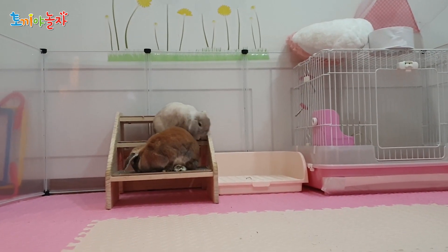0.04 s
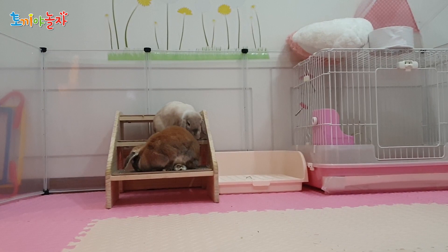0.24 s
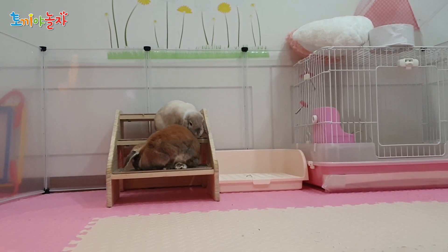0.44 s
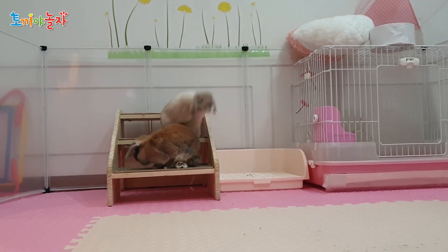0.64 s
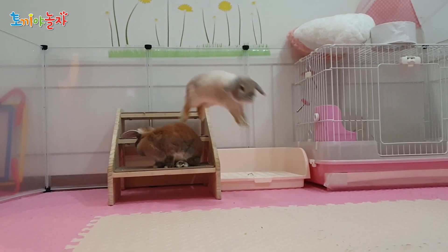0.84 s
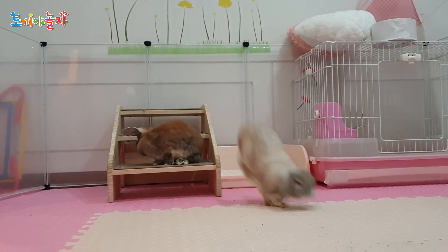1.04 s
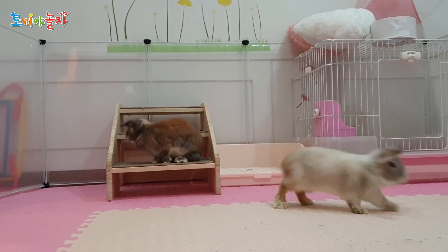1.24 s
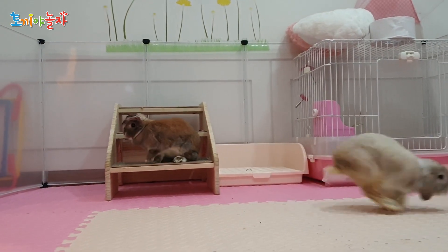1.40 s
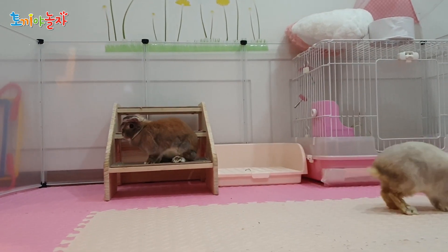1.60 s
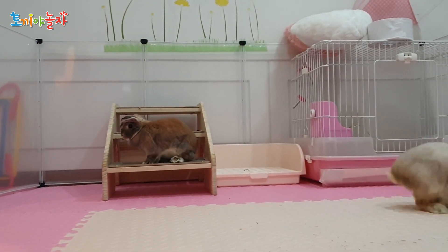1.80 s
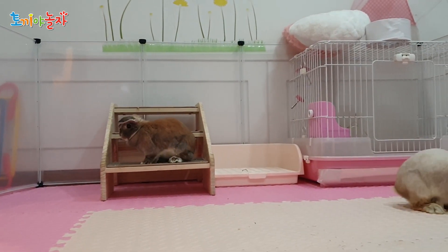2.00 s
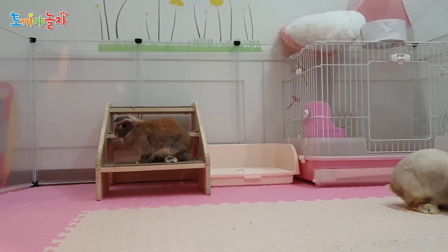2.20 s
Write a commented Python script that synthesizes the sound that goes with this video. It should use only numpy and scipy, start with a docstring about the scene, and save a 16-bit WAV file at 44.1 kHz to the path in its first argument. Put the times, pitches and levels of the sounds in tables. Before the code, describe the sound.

A rabbit thumps down onto a mat and scuffs away, after close microphone handling knocks.

```python
"""A rabbit jumps off a wooden step onto a foam mat, heard in stereo in a small room. Forepaws slap,
hind feet follow with dull pats, the floor booms and the pen rings faintly; it hops away with soft scuffs.
The recorder is hand-held: fingers knock and slide on its casing, close to the right microphone.
Behind it all lies quiet room tone, a low rumble under faint hiss."""
import sys
import numpy as np
from scipy import signal
from scipy.fft import rfft, irfft
from scipy.io import wavfile

SR = 44100
rng = np.random.default_rng(int(sys.argv[2]) if len(sys.argv) > 2 else 0)


def digitize_waveform(pressure):
    """Quantize a signal to 16-bit integers and store it at the path in sys.argv[1].

    Rows of a 2-D input are taken as channels; values are limited to [-1, 1].
    """
    field = np.atleast_2d(pressure).T
    bounded = np.clip(field, -1, 1)
    quanta = np.round(bounded * 32767).astype(np.int16)
    wavfile.write(sys.argv[1], SR, quanta)


N = 103635
T = np.arange(N) / SR


def from_db(db):
    """Decibels to gain."""
    return 10 ** (np.asarray(db) / 20)


def unit_rms(x):
    """Scale to unit rms."""
    return x / np.sqrt(np.mean(x ** 2) + 1e-20)


def level(rows):
    """Gain over time from (s, dB) rows."""
    return from_db(np.interp(T, *np.transpose(rows)))


def octaves():
    """The frequency axis in octaves."""
    return np.log2(np.maximum(np.arange(N // 2 + 1) * SR / N, 1))


def colour(points):
    """dB per frequency from (Hz, dB) rows."""
    hz, db = np.transpose(points)
    return np.interp(octaves(), np.log2(hz), db)


def noise(db, grain=0):
    """Two channels of coloured noise; grain makes the level jump every 32 samples."""
    white = rng.standard_normal((2, N))
    jumps = np.repeat(rng.standard_normal(N // 32 + 1), 32)[:N]
    return unit_rms(irfft(rfft(white * np.exp(grain * jumps)) * from_db(db), N))


def stroke(s, rise, decay):
    """A linear rise from time s, then an exponential fall."""
    return np.clip((T - s) / rise, 0, 1) * np.exp(-np.maximum(T - s - rise, 0) / decay)


def cut(x, hz, kind, order=2):
    """Low- or high-pass."""
    return signal.sosfilt(signal.butter(order, min(hz, .45 * SR), kind, fs=SR, output="sos"), x + 1e-18)


def resonate(x, hz, q):
    """A resonance with unit gain at its peak."""
    return signal.lfilter(*signal.iirpeak(min(hz, .45 * SR), q, fs=SR), x + 1e-18)


def room_tone():
    """Wavering rumble, much alike at both microphones, under a faint hiss."""
    # Each row: time in seconds, level in dB.
    rumble_levels = [(0, -51), (.7, -49), (1.0, -55), (1.45, -47.5), (1.7, -52), (1.84, -59), (2.02, -49),
                     (2.35, -59.5)]
    # Spectra. Each row: frequency in Hz, relative level in dB.
    rumble_colour = [(25, -34), (40, 2), (58, 6.5), (100, -6.5), (200, -10), (300, -17.5), (450, -29.5),
                     (1000, -34.5), (4000, -89)]
    hiss_colour = [(150, -3.5), (500, -2.5), (1000, -5), (3000, -9.5), (8500, -18), (12500, -7.5),
                   (16000, -14)]
    sides = noise(colour(rumble_colour))
    rumble = level(rumble_levels) * unit_rms(sides + 0.47 * sides[::-1])
    return rumble + from_db(-67.5) * noise(colour(hiss_colour))


def reverb(x, t60=0.29):
    """The small room's dense dying tail, different at each microphone."""
    tail = rng.standard_normal((2, N)) * stroke(0.013, 0.007, t60 / np.log(1000))
    return signal.fftconvolve(x, unit_rms(tail) / np.sqrt(N), axes=1)[:, :N]


def grip_rumble():
    """The hand's grip rumbles through the recorder."""
    # Each row: time in seconds, level in dB.
    grip_levels = [(0, -47), (.15, -36), (.3, -33), (.37, -54), (.52, -52), (.68, -51), (.76, -44.5),
                   (.83, -35), (1.0, -55.5), (1.44, -50), (1.56, -51.5), (1.83, -59.5), (2.35, -52.5)]
    # Each row: frequency in Hz, relative level in dB.
    grip_colour = [(25, -25), (55, 14.5), (100, 4.5), (200, -6.5), (400, -20.5), (1500, -42.5), (6000, -60)]
    return level(grip_levels) * noise(colour(grip_colour))[0]


def finger_slide(split_hz=9300):
    """Skin hisses as it slides by the microphone; its top treble comes and goes."""
    # The whole hiss, then its treble against the rest. Each row: time in seconds, level in dB.
    slide_levels = [(0, -100), (.3, -69.5), (.45, -57.5), (.57, -67), (.69, -56), (.77, -59), (.89, -51.5),
                    (1.05, -50.5), (1.15, -61), (1.36, -53.5), (1.5, -63), (1.55, -49), (1.66, -59.5),
                    (1.87, -63), (1.93, -55), (2.02, -63.5), (2.2, -76), (2.35, -70)]
    treble_levels = [(.2, 13.5), (.45, -14), (.75, -4.5), (.92, 2), (1.15, -4.5), (1.7, -8.5), (1.93, -0.5),
                     (2.1, -12)]
    # Each row: frequency in Hz, relative level in dB.
    skin_colour = [(1000, -22.5), (3700, -18), (4900, -5.5), (6500, -6), (7400, -20.5), (9500, -21.5),
                   (12500, -0.5), (14500, -8.5), (16000, -16)]
    skin = noise(colour(skin_colour), grain=0.18)
    treble = level(treble_levels) * cut(skin, split_hz, "high", order=4)
    return level(slide_levels) * (cut(skin, split_hz, "low", order=4) + treble)


def casing_ticks():
    """Tiny clicks ring the casing's high modes."""
    # Each row: start in seconds, relative level in dB.
    ticks = [(.1325, -33), (0.1601, -7.5)]
    # Each row: frequency in Hz, Q, gain in dB.
    modes = [(2950, 9.2, -8.5), (7040, 18, -9.5), (8300, 13, -17.5), (11360, 14, -0.5), (15000, 22, -27)]
    clicks = sum(from_db(db) * np.diff(1.0 * (T >= s), prepend=0) for s, db in ticks)
    return sum(from_db(db) * resonate(clicks, hz, q) for hz, q, db in modes)


def finger_knocks():
    """Each knock is a softened push that thuds in the casing's low modes."""
    # Each row: start in seconds, relative level in dB, contact brightness in Hz.
    knocks = [(0.021, -19.5, 133), (0.066, -25.5, 116), (0.108, -25, 131), (0.133, -34, 184),
              (0.157, -22.5, 172), (0.191, -29.5, 404), (0.2082, -4, 330), (0.212, -16.5, 363),
              (0.2572, -13, 288), (0.2652, -19, 261), (.287, -17, 234), (0.4440, -25, 324),
              (0.55, -31.5, 104), (0.572, -27, 109), (0.795, -23.5, 147), (0.8057, -30, 213),
              (0.83, -34, 250), (1.491, -27, 115)]
    # Each row: frequency in Hz, Q, gain in dB.
    modes = [(78.2, 2.33, 3.5), (234, 1.37, -4)]
    pushes = sum(from_db(db) * cut(1.0 * (T >= s), hz, "low", order=3) for s, db, hz in knocks)
    pulses = np.diff(pushes, prepend=0)
    thuds = -sum(from_db(db) * q * resonate(pulses, hz, q) * SR / (2 * np.pi * hz) for hz, q, db in modes)
    return cut(thuds, 50, "high", order=1)


def casing_cracks():
    """The gripped shell cracks; skin drags on it with a dry rustle."""
    # Each row: start in seconds, relative level in dB, lower and upper band edge in Hz.
    cracks = [(.133, -53, 1000, 5000), (.2091, -19, 604, 4000), (0.2126, -12.5, 626, 2750),
              (.2582, -22.5, 2720, 3130), (.2885, -45, 900, 2200), (.3138, -53, 4500, 5800),
              (.4445, -25, 670, 1970), (.657, -51, 700, 2500), (.8055, -33.5, 1400, 4480),
              (.8313, -35, 1100, 5230)]
    # Each row: start in seconds, level in dB, rise and decay in seconds.
    drags = [(.29, -65.5, 0.035, 0.28), (.42, -70.5, 0.055, 0.042), (.65, -65.5, 0.01, 0.11),
             (.81, -63.5, 0.02, 0.039)]
    # Each row: frequency in Hz, relative level in dB.
    grit_colour = [(400, 3), (1000, 4), (1700, 0), (2300, 1), (3100, -12.5), (3700, -18), (5000, -16),
                   (6500, -23)]
    snaps = -sum(from_db(db) * cut(cut(stroke(s, 1 / SR, 0.0019), low, "high"), top, "low", order=8)
                 for s, db, low, top in cracks)
    # A faint, brief hiss after each crack.
    noise_tails = sum(from_db(db - 35.5) * stroke(s, 1 / SR, decay=0.02) for s, db, _, _ in cracks)
    rustles = sum(from_db(db) * stroke(s, rise, decay) for s, db, rise, decay in drags)
    return snaps + (noise_tails + rustles) * noise(colour(grit_colour), grain=0.3)[0]


def handling():
    """Handling noise, close to the right microphone and weaker in the left."""
    grip, slide = grip_rumble(), finger_slide()
    shell = cut(finger_knocks() + casing_cracks() + grip, 42, "high")
    return sum(x * from_db([[left_db], [0]])
               for x, left_db in [(shell, -35), (casing_ticks(), -6), (slide, -17)])


def floor_and_pen():
    """The rabbit's weight booms in the floor and sets floor and pen ringing, centred in the image."""
    # Each row: start in seconds, level in dB, pitch in Hz, swell in seconds.
    thumps = [(1.097, -19, 72.8, 0.03), (1.174, -22.5, 80, 0.02), (1.276, -42, 73.3, 0.047),
              (1.535, -34.5, 73.6, 0.016), (1.593, -42.5, 76.8, 0.016), (1.642, -53, 56.3, 0.044),
              (1.922, -38, 83.1, 0.03), (2.197, -43, 58.5, 0.034), (2.286, -44, 57.6, 0.028)]
    # Footfalls that start the ringing. Each row: start in seconds, level in dB.
    shakes = [(1.083, -38.5), (1.1341, -34), (1.1732, -28.5), (1.224, -30), (1.2882, -41.5), (1.3385, -44),
              (1.947, -62)]
    # Each row: frequency in Hz, gain in dB, seconds to fall 60 dB.
    pen_modes = [(156.6, 2, 0.19), (158.72, -6.5, 0.64), (304, -13.5, 0.3), (419, -25.5, 0.28),
                 (590, -28, 0.16), (628, -26, 0.1), (680, -26.5, 0.14), (730, -45, 0.19)]
    boom, ring = np.zeros(N), np.zeros(N)
    for s, db, hz, swell in thumps:
        t = np.maximum(T - s, 0)
        boom += from_db(db) * (t / swell * np.exp(1 - t / swell)) ** 2 * np.cos(2 * np.pi * hz * t)
    for s, db in shakes:
        for hz, mode_db, t60 in pen_modes:
            envelope = from_db(db + mode_db) * stroke(s, 0.0066, t60 / np.log(1000))
            ring += envelope * np.sin(2 * np.pi * hz * (T - s))
    both = np.array([boom + ring] * 2)
    return both + from_db(-9) * reverb(both)


def cage_wires(slaps, t60=0.11):
    """The cage's tray and thin wires ring in answer to the slaps."""
    # Each row: frequency in Hz, relative level in dB.
    modes = [(1050, 1), (2088, 0.5), (2350, -1.5), (2760, -8), (2993, -13), (3172, -1), (3266, -10),
             (3352, 7.5), (3655, -2), (4750, -3), (4882, -17)]
    return sum(from_db(db + 3) * resonate(slaps, hz, hz * t60 * np.pi / np.log(1000)) for hz, db in modes)


def paw_scuffs():
    """Paws slide and push off, each a band of uneven friction noise."""
    # Each row: start in seconds, level in dB, rise and decay in seconds, centre in Hz, width in octaves.
    scuffs = [(1.269, -51.5, 0.012, 0.038, 3970, 0.59), (1.379, -63, 0.06, 0.15, 1974, 0.16),
              (1.519, -50.5, 0.043, 0.043, 5500, 1.2), (1.665, -58, 0.027, 0.045, 2850, 0.18),
              (1.66, -63, 0.011, 0.028, 5330, 0.4), (1.78, -62.5, 0.038, 0.014, 9700, 3.3),
              (1.883, -65, 0.0053, 0.034, 2930, 0.74)]
    friction = np.zeros((2, N))
    for s, db, rise, decay, hz, width in scuffs:
        band_db = -15 * np.log10(1 + ((octaves() - np.log2(hz)) / width) ** 2)
        friction += from_db(db) * stroke(s, rise, decay) * noise(band_db, grain=0.17)
    return friction


def hind_pats():
    """The body drops onto its hind feet with dull pats."""
    # Each row: start in seconds, level in dB, rise and decay in seconds.
    pats = [(1.082, -48, 0.002, 0.059), (1.168, -40, 0.005, 0.027), (1.199, -43.5, 0.0038, 0.015),
            (1.251, -58, 0.0059, 0.033)]
    envelope = sum(from_db(db) * stroke(s, rise, decay) for s, db, rise, decay in pats)
    return envelope * unit_rms(cut(cut(rng.standard_normal(N), 214, "high"), 614, "low", order=4))


def paw_slaps():
    """Paws hit the mat in grainy bursts, with one sharp claw click."""
    # Each row: start in seconds, level in dB, rise and decay in seconds, tilt in dB per octave.
    hits = [(1.0734, -42, 0.005, 0.009, 3), (1.082, -32.5, 0.0012, 0.049, 0),
            (1.168, -42.5, 0.016, 0.04, 3), (1.19, -42, 0.018, 0.02, 6.5)]
    # Each row: frequency in Hz, relative level in dB.
    slap_colour = [(120, -1), (300, 7), (450, 0), (630, 14), (850, -4), (1450, -1.5), (2200, -2),
                   (3400, -3.5), (5000, -7), (8000, -11.5), (12500, -15.5), (16000, -22)]
    spectrum = colour(slap_colour)
    slaps = sum(from_db(db) * stroke(s, rise, decay) * noise(spectrum + tilt * octaves(), grain=0.3)
                for s, db, rise, decay, tilt in hits)
    claw = from_db(-28.5) * stroke(1.0822, rise=0.000048, decay=0.00068) * noise(spectrum)
    return slaps + claw


def rabbit():
    """Paws and wires heard across the room: centred in the bass, wide in the treble."""
    # The right microphone's colour. Each row: frequency in Hz, Q, gain in dB.
    right_port = [(5200, 2.75, 11), (8460, 1.48, -51), (12440, 5.5, 10.5)]
    slaps = paw_slaps()
    direct = slaps + cage_wires(slaps) + paw_scuffs()
    pats = hind_pats()
    mid = (direct[0] + direct[1]) / 2 + pats
    side = 0.91 * cut((direct[0] - direct[1]) / 2, 900, "high", order=1)
    left, right = np.array([mid + side, mid - side]) + from_db(-8) * reverb(direct + pats)
    for hz, q, db in right_port:
        right = right + (from_db(db) - 1) * resonate(right, hz, q)
    return np.array([left, right])


def scene():
    """The rabbit, the floor, the hand and the room at the two microphones."""
    return rabbit() + floor_and_pen() + handling() + room_tone()


def record(dry):
    """The recorder cuts steeply above 15.9 kHz."""
    return signal.sosfilt(signal.ellip(10, .2, 80, 15900, fs=SR, output="sos"), dry)


dry = scene()
out = record(dry)
digitize_waveform(out)
```